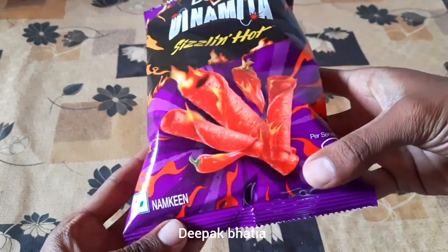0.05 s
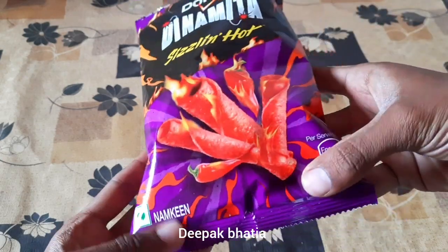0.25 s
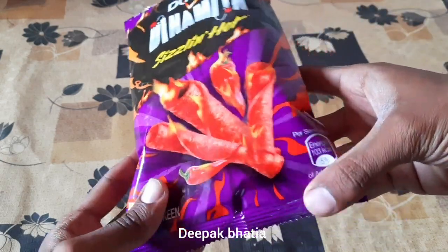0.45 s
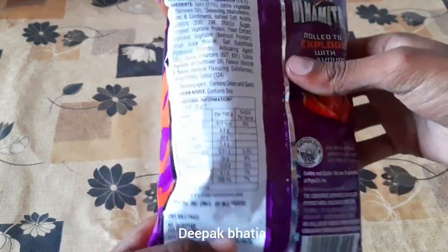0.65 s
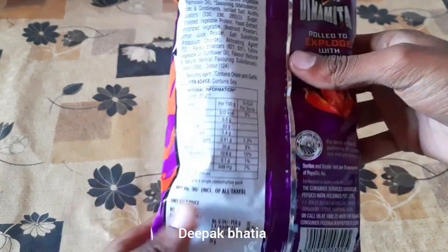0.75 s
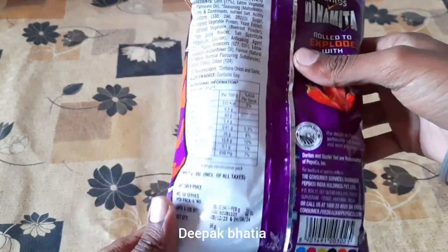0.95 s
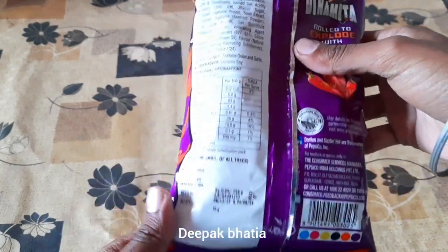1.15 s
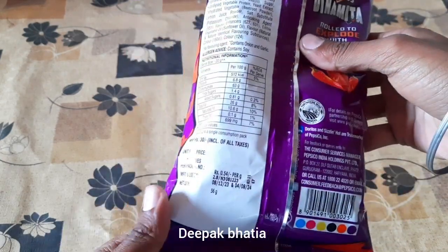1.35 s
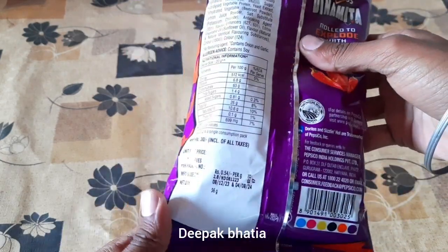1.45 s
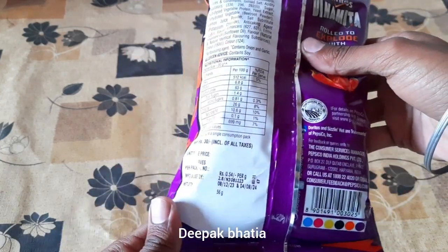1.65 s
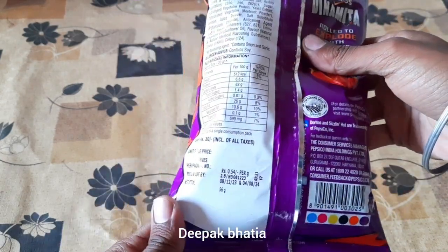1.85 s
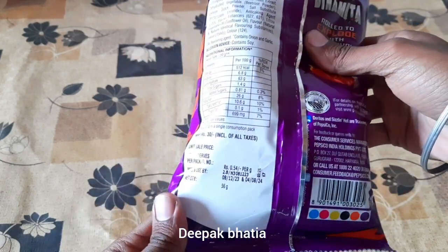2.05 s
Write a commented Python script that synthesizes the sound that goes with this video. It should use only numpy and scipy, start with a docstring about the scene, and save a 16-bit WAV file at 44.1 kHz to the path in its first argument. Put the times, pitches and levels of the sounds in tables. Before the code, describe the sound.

Close up in a small, hard-walled room, a foil snack bag crinkles in someone's hands. Irregular crackles and soft fingertip bumps build to a brief rustling crumple, followed by a few separate snaps and faint ticks.

```python
"""Snack bag in the hands

A foil-lined bag is turned over, close up in a small, hard-walled room. Creases snap through and kick
the air-filled panels; slack film buckles in duller pops, tiny ticks and one short crumple.
Fingers rub and bump the bag between the snaps, over a faint room rumble."""
import sys
import numpy as np
from scipy import signal
from scipy.fft import rfft, irfft, next_fast_len
from scipy.io import wavfile
from scipy.ndimage import uniform_filter1d

SR = 44100
rng = np.random.default_rng(int(sys.argv[2]) if len(sys.argv) > 2 else 0)


def store_pcm(level_fs):
    """Save levels as 16-bit WAV."""
    pcm = np.round(np.clip(level_fs, -1, 1) * 32767).astype(np.int16)
    wavfile.write(sys.argv[1], SR, np.atleast_2d(pcm).T)


N = 92610
T = np.arange(N) / SR
BURST_T = np.arange(SR // 25) / SR

# Fader rides for rubbing fingers, sliding film, handling rumble and the thumb's creak: time_s, level_db
RUB_RIDE = [(0, -76), (.03, -50), (.1, -67.5), (.17, -55.5), (.32, -50), (.5, -71), (.55, -36.5),
            (.6, -46.5), (.665, -34.5), (.695, -61), (.76, -44), (.83, -54.5), (.97, -61.5), (1.03, -47.5),
            (1.12, -68.5), (1.2, -52), (1.45, -78.5), (1.56, -81), (1.7, -47.5), (1.8, -90.5), (2.1, -62.5)]
SLIDE_RIDE = [(0, -62.5), (.03, -55.5), (.18, -74), (.33, -56.5), (.5, -53.5), (.535, -50.5), (.55, -39),
              (.59, -47), (.7, -49.5), (.9, -57), (1.9, -90.5), (2.02, -61.5), (2.1, -82)]
RUMBLE_RIDE = [(0, -68), (.48, -62.5), (.61, -54.5), (.7, -64.5), (.86, -62), (.97, -65), (1.02, -52.5),
               (1.16, -69), (1.46, -71), (1.65, -61.5), (1.85, -90), (2.02, -65)]
CREAK_RIDE = [(1.75, -85), (1.93, -77.5), (1.98, -60.5), (2.1, -69)]
# Tone of the dull rub, the bright slide, the rumble and the room tone: frequency_hz, gain_db
RUB_EQ = [(60, -17.5), (150, 7.5), (350, 10.5), (900, 0.5), (1700, -4.5), (3000, -23.5), (7000, -18),
          (10000, -24.5), (16000, -27.5)]
SLIDE_EQ = [(500, -25.5), (2000, -0.5), (4000, -7), (7500, -3.5), (9700, -3), (14000, 3), (16000, -1)]
RUMBLE_EQ = [(25, -27), (64, -2), (85, -2.5), (130, -6), (600, -37)]
ROOM_TONE_EQ = [(20, -33), (70, -4.5), (150, -9), (1400, -17), (3000, -42), (7000, -22.5), (10000, -30.5),
                (16000, -35)]
# Slack film buckling softly: start_s, level_db, pitch_hz
POP_CUES = [(0.024, -39.5, 910), (0.1141, -56, 1640), (0.1365, -51, 895), (0.346, -35, 814),
            (0.448, -40.5, 902), (0.611, -29, 490), (0.626, -26.5, 840), (0.649, -32, 1192),
            (0.667, -37, 1063), (0.7122, -35.5, 430), (0.7365, -38, 744), (0.9593, -49, 806),
            (0.9891, -39, 670), (1.1771, -38, 620), (1.551, -57, 490), (1.627, -42.5, 624),
            (1.8438, -55.5, 1420), (1.925, -58, 1310)]
# Fingertips knocking the air-filled bag: start_s, level_db, pitch_hz
THUD_CUES = [(.034, -52, 173), (.143, -46, 120), (0.253, -42, 114), (0.278, -51.5, 141), (.408, -32.5, 237),
             (.517, -43, 182), (0.54, -36, 167), (0.563, -39.5, 237), (0.592, -35, 172),
             (0.629, -36.5, 180.5), (.647, -34.5, 170), (.714, -40, 160), (0.773, -32.5, 172),
             (1.005, -37, 140), (1.026, -37.5, 213), (1.63, -42, 280)]
# Creases snapping through: start_s, thump_db, thump_hz, panel_db, panel_hz, crack_db, crease_hz,
# ping_over_crack_db, sizzle_db
SNAP_CUES = [(0.2063, -44.5, 390, -41, 1770, -39, 2260, 1, -78),
             (0.2333, -33.5, 616, -37.5, 1500, -28, 4300, -5.5, -45),
             (0.353, -27.5, 442, -25, 1000, -26, 2360, 0, -27),
             (0.4034, -36.5, 260, -34, 1240, -34, 4920, -3.5, -38),
             (0.4815, -30, 371, -34, 1600, -43, 2350, -5, -43),
             (0.5311, -40, 604, -38, 1450, -32.5, 6550, -8.5, -23.5),
             (0.5983, -43.5, 237.3, -30, 1150, -30, 2250, 3.5, -42.5),
             (0.6233, -25, 512, -26, 1500, -35.5, 2050, -6, -33.5),
             (0.6586, -25, 510, -29, 1000, -35, 2500, -3.5, -36),
             (0.7683, -40, 287, -41, 940, -28, 3930, -18, -19.5),
             (0.77, -30.5, 327.5, -20, 930, -23.5, 4097, -13.5, -17),
             (1.0057, -24.5, 290, -26.5, 1100, -20.5, 2396, -11.5, -30),
             (1.0484, -36.5, 340, -28, 1200, -32.5, 5300, -9.5, -29.5),
             (1.062, -32, 368, -31.5, 750, -34.5, 2800, -2.5, -42),
             (1.2295, -30.5, 295, -17, 1020, -25.5, 3660, -12, -25),
             (1.644, -38.5, 323, -31.5, 1300, -35, 5600, 14, -38),
             (1.6506, -34, 370, -34.5, 1000, -35, 2930, -7, -39.5),
             (1.6753, -42.5, 337, -33.5, 1310, -34.5, 6800, 4, -29)]
# Tiny wrinkles ticking: start_s, level_db
TICK_CUES = [(.314, -52), (1.509, -68), (1.971, -64), (2.066, -66)]
# Time the room takes to die away by 60 dB: frequency_hz, decay_s
REVERB_DECAY = [(150, 0.32), (400, .34), (1000, 0.32), (2800, 0.32), (7000, 0.31), (15000, .24)]
# Reverb level against the direct sound: frequency_hz, wet_db
REVERB_EQ = [(60, -16), (200, -6.5), (390, -2.5), (640, -9), (810, -3.5), (1050, -9.5), (2000, -5.5),
             (5000, -10.5), (15000, -10)]
# How alike left and right are in diffuse sound: frequency_hz, correlation
STEREO_LIKENESS = [(60, .9), (180, 0.96), (550, 0.68), (1600, 0.034), (16000, 0.42)]
# Tone of the microphone: frequency_hz, gain_db
MIC_EQ = [(100, 0), (600, -3), (820, -0.5), (1600, 1.5), (3000, 4.5), (5000, 4), (8000, 0.5), (9700, -9),
          (12000, -6), (16000, -15)]
# Lean to the left, of which each microphone port takes about half: frequency_hz, lean_db
MIC_LEAN = [(60, -3), (400, -0.4), (2000, -1), (4000, 0), (6500, -3), (9000, 5.5), (15000, 8)]

# How a kick scatters through the film: decay_s, energy_over_kick_db, stereo_share
POP_SCATTER, THUD_SCATTER = (0.0051, 1, 0.13), (0.004, -2.5, 0.11)
THUMP_SCATTER, PANEL_SCATTER = (0.0024, -2.4, 0.031), (0.0024, 3, 0.025)
CRACK_SCATTER, SIZZLE_SCATTER = (0.0012, 11, 1), (0.0011, 7, 0.7)
PANEL_BAND_HZ, PING_BAND_HZ, POP_Q = (400, 2630), (400, 7660), 3.4


def from_db(db):
    """Decibels to gain."""
    return 10 ** (np.asarray(db) / 20)


def rms_one(x):
    """Scale to unit rms."""
    return x / np.sqrt(np.mean(x ** 2) + 1e-20)


def at_hz(points, hz):
    """Read a table on a log-frequency axis."""
    freqs, values = np.transpose(points)
    return np.interp(np.log(np.maximum(hz, 1)), np.log(freqs), values)


def ride(x, curve):
    """Normalise a layer and ride its fader along time_s, level_db points."""
    return from_db(np.interp(T, *np.transpose(curve))) * rms_one(x)


def band(x, band_hz):
    """Causal band-pass."""
    return signal.sosfilt(signal.butter(2, band_hz, "band", fs=SR, output="sos"), x)


def minimum_phase(gain):
    """Causal frequency response with the given magnitudes."""
    cepstrum = irfft(np.log(gain))
    half = len(cepstrum) // 2
    cepstrum[1:half] *= 2
    cepstrum[half + 1:] = 0
    return np.exp(rfft(cepstrum))


def eq(x, points, amount=1):
    """Causal EQ along frequency_hz, gain_db points; amount scales the curve."""
    size = next_fast_len(N + SR // 4, True) // 2 * 2
    gain = from_db(amount * at_hz(points, np.fft.rfftfreq(size, 1 / SR)))
    return irfft(rfft(x, size) * minimum_phase(gain))[..., :N]


def diffuse(size):
    """Stereo white noise, narrow in the bass and wide higher up."""
    mid, side = rfft(rng.standard_normal((2, size)))
    alike = at_hz(STEREO_LIKENESS, np.fft.rfftfreq(size, 1 / SR))
    return irfft(np.sqrt((1 + alike) / 2) * mid + np.sqrt((1 - alike) / 2) * side * [[1], [-1]], size)


def friction(hiss_db, slips_per_s=430, spread_db=5):
    """Dense little slips of uneven size on a smooth hiss."""
    sizes = from_db(spread_db * np.minimum(rng.exponential(1, N), 4)) * rng.choice([-1, 1], N)
    slips = sizes * (rng.random(N) < slips_per_s / SR)
    return rms_one(slips) + from_db(hiss_db) * diffuse(N)


def kick(scatter, evenness=0.35):
    """One sharp kick and its quickly dying scatter through the film, partly evened out in tone."""
    decay_s, scatter_db, width = scatter
    noise = rng.standard_normal((3, len(BURST_T)))
    burst = (np.sqrt(1 - width) * noise[0] + np.sqrt(width) * noise[1:]) * np.exp(-BURST_T / decay_s)
    burst *= from_db(scatter_db) / np.sqrt(np.sum(burst ** 2) / 2)
    burst[:, 0] += 1  # the kick itself
    spectrum = rfft(burst, 2 * len(BURST_T))
    ripple = np.sqrt(uniform_filter1d(np.mean(abs(spectrum) ** 2, axis=0), size=9))
    return irfft(spectrum * minimum_phase(ripple ** -evenness))[:, :len(BURST_T)]


def ring(x, hz, q, band_hz):
    """A heavily damped resonance of film or trapped air, lasting a few cycles."""
    radius = np.exp(-np.pi * hz / q / SR)
    feedback = [1, -2 * radius * np.cos(2 * np.pi * hz / SR), radius * radius]
    return band(signal.lfilter([1, 0, -1], feedback, x), band_hz)


def place(out, start_s, level_db, burst, window_s=0.006):
    """Drop a burst on its cue; level_db is its rms as if all its energy fell within window_s."""
    start = int(start_s * SR)
    gain = from_db(level_db) * np.sqrt(2 * window_s * SR / np.sum(burst ** 2))
    out[:, start:start + burst.shape[1]] += gain * burst[:, :N - start]


def room_tone(level_db=-72):
    """The room's faint, steady rumble."""
    return from_db(level_db) * rms_one(eq(diffuse(N), ROOM_TONE_EQ))


def handling_rumble():
    """Low end that swells as the hands move the bag."""
    return ride(eq(diffuse(N), RUMBLE_EQ), RUMBLE_RIDE)


def finger_friction():
    """Fingers rub with a dull grain; film slides through them with a bright hiss as the bag flips."""
    rub = ride(eq(friction(hiss_db=2), RUB_EQ), RUB_RIDE)
    slide = ride(eq(friction(hiss_db=11), SLIDE_EQ), SLIDE_RIDE)
    return rub + slide


def slack_pops():
    """Slack film buckles and rings one panel in a soft, dull pop."""
    out = np.zeros((2, N))
    for start_s, level_db, pitch_hz in POP_CUES:
        place(out, start_s, level_db, ring(kick(POP_SCATTER), pitch_hz, POP_Q, band_hz=(198, 1870)))
    return out


def fingertip_thuds():
    """Fingertips land on the bag; the air cushion answers with a few low cycles."""
    out = np.zeros((2, N))
    for start_s, level_db, pitch_hz in THUD_CUES:
        place(out, start_s, level_db, ring(kick(THUD_SCATTER), pitch_hz, q=2.33, band_hz=(85, 414)))
    return out


def taut_panel(hz, mode_ratio=1.6, q=1.54):
    """The body of a snap: a kicked panel rings in two opposed modes, one either side of its pitch."""
    hit = kick(PANEL_SCATTER)
    step = np.sqrt(mode_ratio)
    return ring(hit, hz * step, q, PANEL_BAND_HZ) - ring(hit, hz / step, q, PANEL_BAND_HZ)


def crease_crack(hz, ping_db):
    """The attack of a snap: a sharp crack with a brief ping at the crease's own pitch."""
    hit = kick(CRACK_SCATTER)
    crack = band(hit, band_hz=(1884, 7660))
    ping = ring(hit, hz, q=7.9, band_hz=PING_BAND_HZ)
    return rms_one(crack) + from_db(ping_db) * rms_one(ping)


def crease_snaps():
    """Each crease thumps the air in the bag, rings its panel and cracks, with a sizzle on top."""
    out = np.zeros((2, N))
    for (start_s, thump_db, thump_hz, panel_db, panel_hz,
         crack_db, crease_hz, ping_db, sizzle_db) in SNAP_CUES:
        place(out, start_s, thump_db, ring(kick(THUMP_SCATTER), thump_hz, q=1.3, band_hz=(167, 785)))
        place(out, start_s, panel_db, taut_panel(panel_hz))
        place(out, start_s, crack_db, crease_crack(crease_hz, ping_db))
        place(out, start_s, sizzle_db, band(kick(SIZZLE_SCATTER), band_hz=(8100, 16400)))
    return out


def wrinkle_ticks():
    """Tiny wrinkles buckle in ticks that are all treble."""
    out = np.zeros((2, N))
    for start_s, level_db in TICK_CUES:
        place(out, start_s, level_db, band(kick(CRACK_SCATTER), band_hz=(4390, 8370)))
    return out


def crumple(count=22, span_s=(0.588, 0.678), low_hz=700, high_hz=2800, centre_db=-41.5, range_db=10):
    """A dense, uneven run of small buckles, each with a pitch and strength of its own."""
    out = np.zeros((2, N))
    for when, pitch, softness in rng.random((count, 3)):
        start_s = np.interp(when, (0, 1), span_s)
        pitch_hz = low_hz * (high_hz / low_hz) ** pitch
        level_db = centre_db - range_db * (softness - 0.5)
        place(out, start_s, level_db, ring(kick(CRACK_SCATTER), pitch_hz, POP_Q, PING_BAND_HZ))
    return out


def thumb_creak():
    """The thumb shifts its grip and friction rings the film in a faint creak."""
    return ride(ring(friction(hiss_db=2), hz=1450, q=2.5, band_hz=PANEL_BAND_HZ), CREAK_RIDE)


def reverb(x, predelay_s=0.00067, build_s=0.002):
    """Hard, close walls return a diffuse tail that builds quickly and dies octave by octave."""
    t = T[:SR // 2]
    hz = np.fft.rfftfreq(len(t), 1 / SR)
    spectrum = rfft(diffuse(len(t))) * from_db(at_hz(REVERB_EQ, hz))
    centres_hz = np.geomspace(62, 16000, 9)
    build = 1 - np.exp(-np.maximum(t - predelay_s, 0) / build_s)
    tail = 0
    for centre_hz, solo in zip(centres_hz, np.eye(len(centres_hz))):
        fade = build * from_db(-60 * t / at_hz(REVERB_DECAY, centre_hz))
        octave = irfft(spectrum * at_hz(np.c_[centres_hz, solo], hz), len(t))
        tail = tail + octave * fade / np.sqrt(np.sum(fade ** 2))
    return signal.fftconvolve(x, tail, axes=1)[:, :N]


def scene(left_lead_samples=2):
    """The bag just left of centre and its reverb, over handling rumble and room tone."""
    bag = crease_snaps() + slack_pops() + wrinkle_ticks() + crumple()
    bag += fingertip_thuds() + finger_friction() + thumb_creak()
    direct = np.array([bag[0], np.pad(bag[1], (left_lead_samples, 0))[:N]])
    bed = handling_rumble() + room_tone()
    return direct + reverb(bag) + bed


def record(dry, ceiling=1.1, cutoff_hz=16400):
    """Two unequal microphone ports, gently rounded peaks, then a steep top cut."""
    left, right = eq(dry, MIC_EQ)
    ports = np.array([eq(left, MIC_LEAN, amount=0.53), eq(right, MIC_LEAN, amount=-0.54)])
    rounded = ceiling * np.tanh(ports / ceiling)
    return signal.sosfilt(signal.ellip(10, 0.3, 70, cutoff_hz, fs=SR, output="sos"), rounded)


dry = scene()
out = record(dry)
store_pcm(out)
```